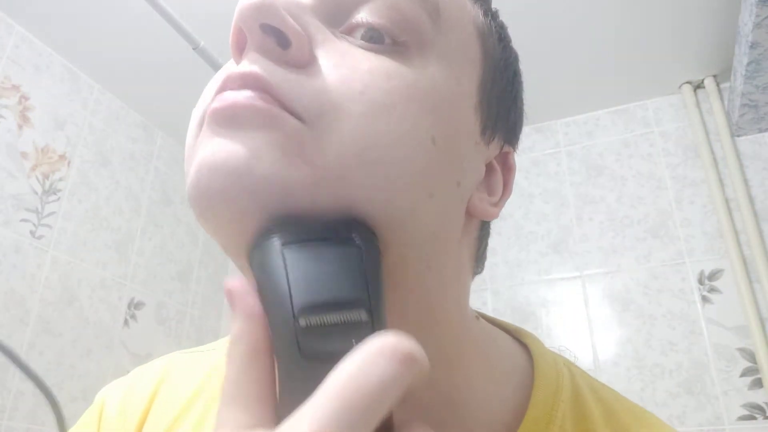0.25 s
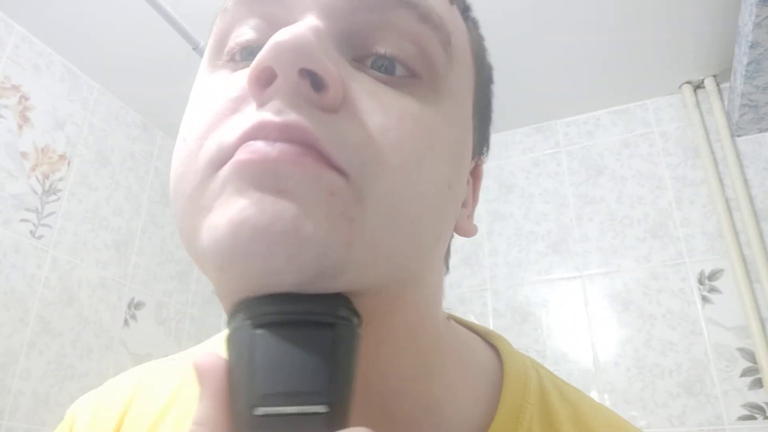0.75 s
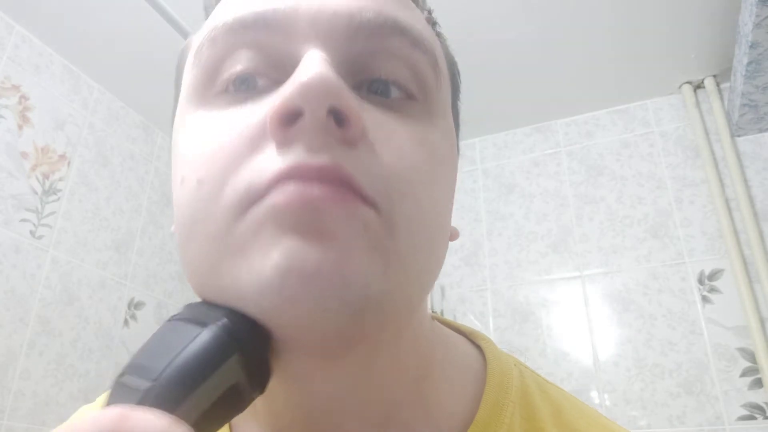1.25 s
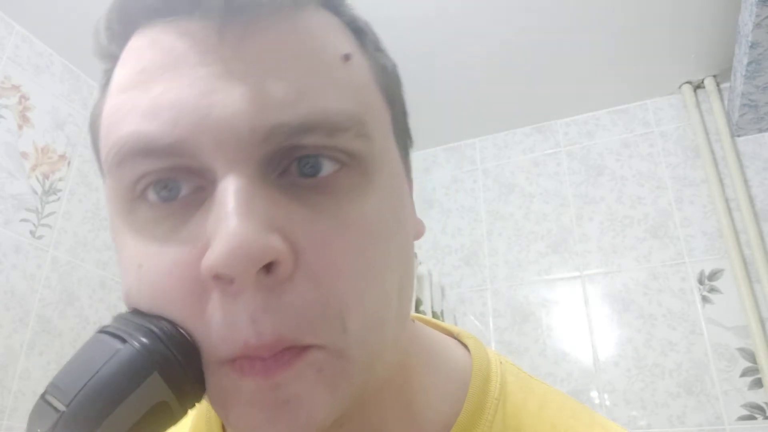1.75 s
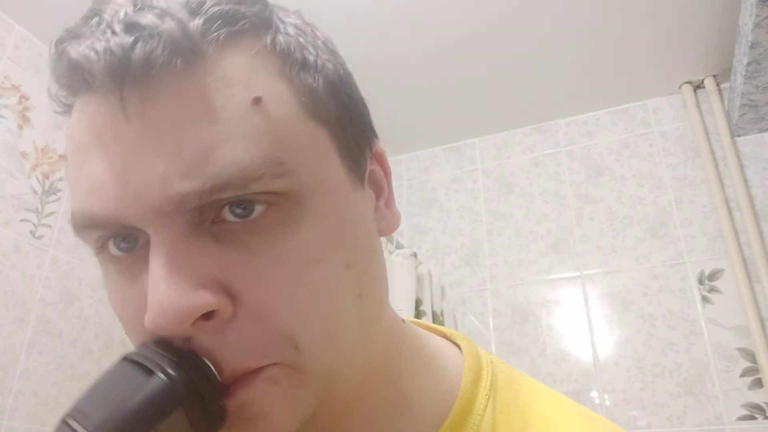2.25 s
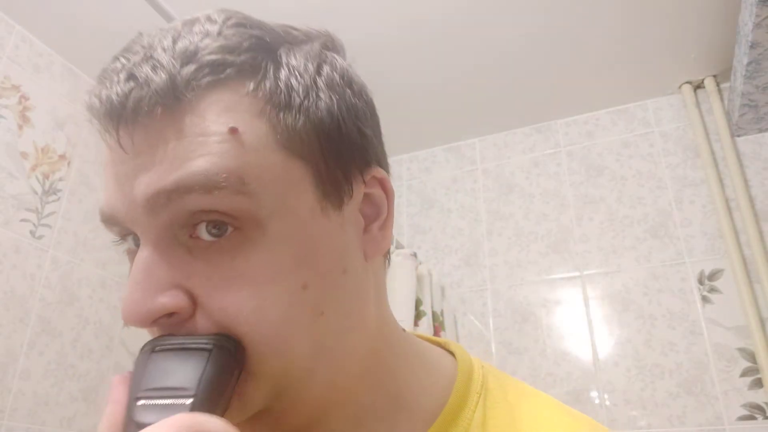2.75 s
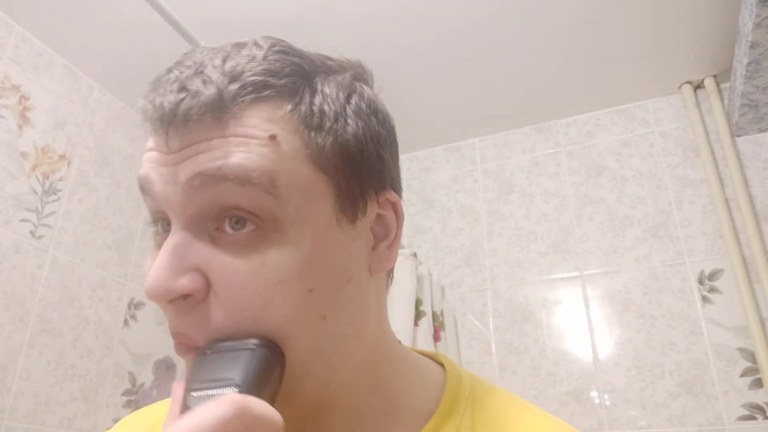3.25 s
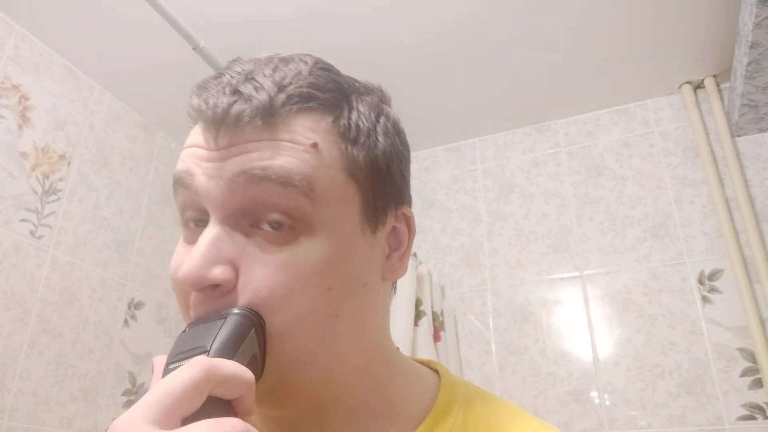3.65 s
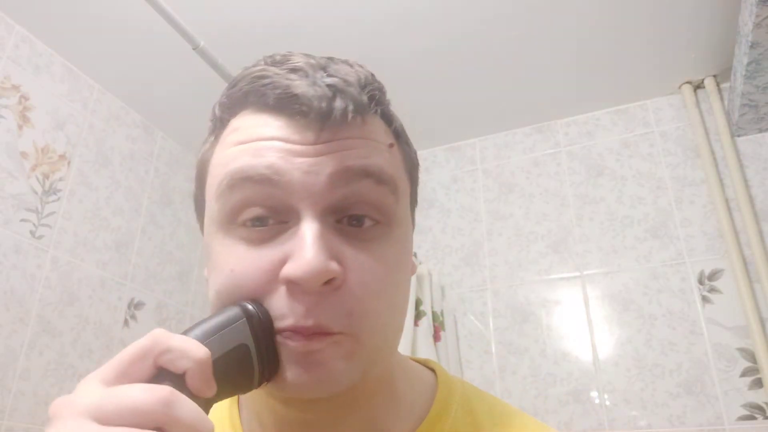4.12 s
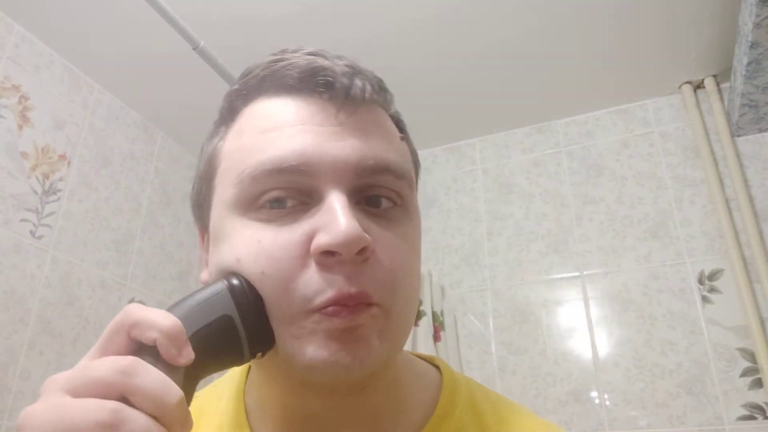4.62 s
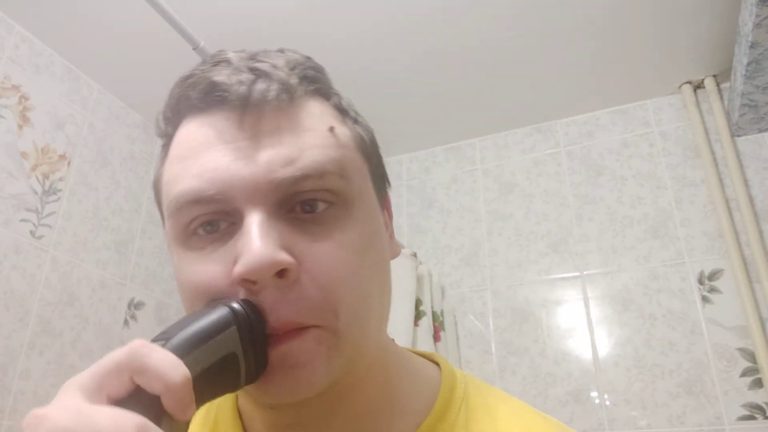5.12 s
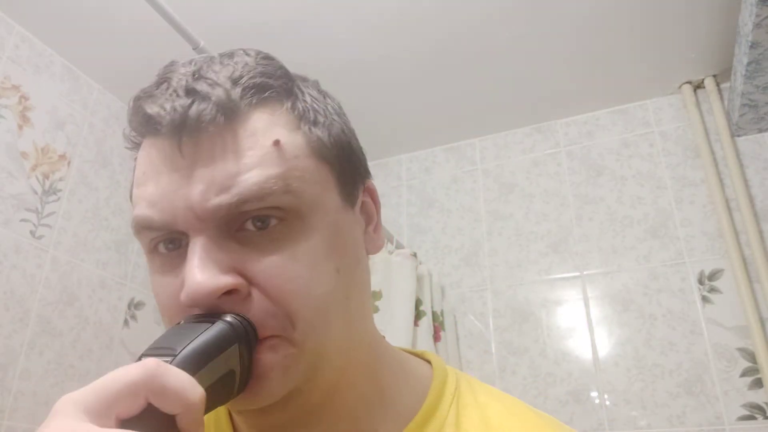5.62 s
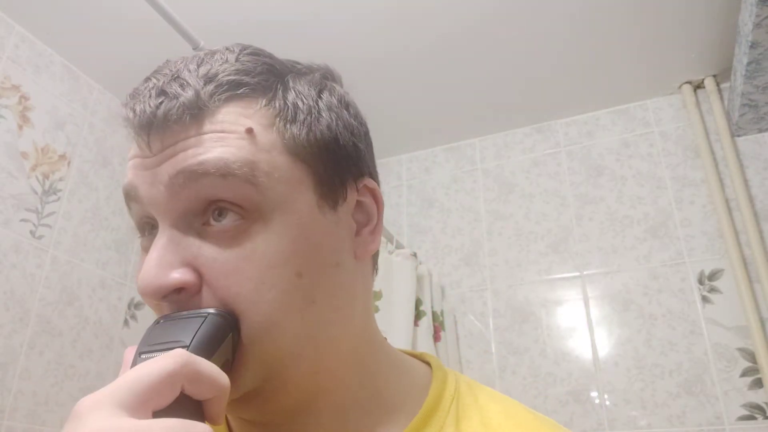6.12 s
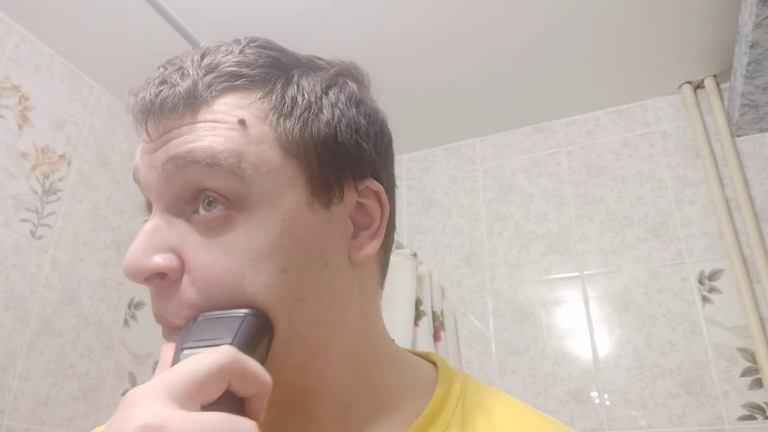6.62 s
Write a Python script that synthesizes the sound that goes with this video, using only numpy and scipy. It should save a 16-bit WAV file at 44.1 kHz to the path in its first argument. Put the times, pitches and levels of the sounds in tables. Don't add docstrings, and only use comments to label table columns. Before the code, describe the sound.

Already running at the start and never stopping, a rotary electric shaver whirs close to a phone in a small tiled bathroom for nearly seven seconds. Its gear and motor whine is steady, with a fast mechanical buzz, a gritty bright hiss and thin, very high metallic singing. On the neck, from 0 to 1 s, it is even; around 1.3-1.5 s the pitch lifts slightly and the hiss swells, then drops under load near 1.7 s. Small dry clicks and snips cluster from 1.8 to 2.3 s, with a sharper crack at 2.8 s amid rattlier, chirping treble. From 3.3 s the rub softens; pitch lifts a little around 3.9-4.5 s, with a thinner whine. Near 5.1, 5.5 and 6 s come more snips and brighter scraping. The low rumble is strongest near 1.8 s and dwindles; faint building hum stays beneath. It ends still running.

```python
import sys
import numpy as np
from scipy import signal
from scipy.fft import rfft, irfft
from scipy.io import wavfile
from scipy.ndimage import uniform_filter1d, map_coordinates

SR = 44100
rng = np.random.default_rng(int(sys.argv[2]) if len(sys.argv) > 2 else 0)


def to_wav(s):
    ch = np.atleast_2d(s).T
    pcm = np.round(np.clip(ch, -1, 1) * 32767)
    wavfile.write(sys.argv[1], SR, pcm.astype(np.int16))


def attenuation_scalar(level_db):
    decades = np.asarray(level_db, float) / 20
    return 10 ** decades


N = 302922
TIME = np.arange(N) / SR
TEETH, SLOTS, MOTOR_RATIO = 17, 90, 3.0206

# (t/s, f/Hz)
SING_PITCH = [(0, 11400), (.14, 11670), (.42, 11650), (.9, 11430), (1.5, 11620), (2.1, 11550),
              (2.55, 11520), (2.8, 11550), (3.2, 11560), (3.4, 11530), (3.72, 11330), (4.0, 11660),
              (4.2, 11580), (4.5, 11570), (5.5, 11460), (6.4, 11480), (6.87, 11580)]
# (t/s, turns counted)
HIGH_BLADE = [(0, -68.7), (2.122, 0), (2.341, 7), (2.59, 15), (2.808, 22), (3.18, 34), (3.962, 59),
              (5.078, 95), (5.481, 108), (5.732, 116), (5.981, 124), (6.39, 137), (6.87, 152.4)]


def curves(table):
    s, *columns = np.transpose(table)
    return [np.interp(TIME, s, column) for column in columns]


def walk(rate):
    hold = int(SR / rate)
    held = np.repeat(rng.standard_normal(N // hold + 1), hold)
    return 1.3 * uniform_filter1d(uniform_filter1d(held, hold), hold)[:N]


def swells(rest, rows):
    squareness = 2.8
    return rest + sum(lift * .5 ** (np.abs(2 * (TIME - middle) / length) ** squareness)
                      for middle, length, lift in rows)


def band(x, lo_hz, hi_hz):
    sos = signal.butter(2, [lo_hz, min(hi_hz, .45 * SR)], "band", fs=SR, output="sos")
    return signal.sosfilt(sos, x)


def colour(x, spectrum):
    hz, db = np.transpose(spectrum)
    gain = attenuation_scalar(np.interp(np.log(np.fft.rfftfreq(N, 1 / SR) + 1), np.log(hz), db))
    return irfft(rfft(x) * gain, N) * np.sqrt(SR / 2)


def pair(alike_hz):
    lag_s, treble_alike = 45e-6, 0.16
    mid, side = rfft(rng.standard_normal((2, N)))
    hz = np.fft.rfftfreq(N, 1 / SR)
    alike = np.clip(treble_alike + (1 - treble_alike) / (1 + hz / alike_hz), 0, 1)
    mid, side = mid * np.sqrt(1 + alike), side * np.sqrt(1 - alike)
    right = (mid - side) * np.exp(-2j * np.pi * hz * lag_s)
    return irfft(np.array([mid + side, right]), N) / np.sqrt(2)


def line(turns, db, wobble, flutter_db, lead=1.27):
    shared = rng.uniform(0, 2 * np.pi) + wobble * walk(25)
    lag = lead + .3 * walk(3)
    phase = 2 * np.pi * turns + shared + np.array([0 * lag, lag])
    level = attenuation_scalar(db + flutter_db * (walk(30.) + 0.37 * walk(9)))
    return np.sqrt(2) * level * np.sin(phase)


def clatter(wheel, hold_turns, alike):
    size = 1400
    pattern = rng.standard_normal((3, 120, size))
    place = [wheel / hold_turns, wheel % 1 * size]
    shared, *own = (map_coordinates(p, place, order=1, mode="grid-wrap") for p in pattern)
    return 1.5 * (alike * shared + np.sqrt(1 - alike ** 2) * np.array(own))


def building():
    hum_hz = [30.2, 78.8, 105.0]
    # (resting level/dB, [(middle t/s, length/s, lift/dB)])
    surges = [
        (-72, [(.29, 0.26, 12.5), (1.65, 0.38, 12), (3.65, 0.38, 7), (4.75, 0.89, 6), (5.44, 0.3, -10), (5.72, 0.32, 8.5), (6.58, 0.32, 6)]),
        (-80.5, [(0, 0.33, 10.5), (.86, 0.41, 5), (1.5, 0.45, 8), (3.75, 1, 11), (4.55, 0.39, 1), (6.15, 0.35, 4)]),
        (-85.5, [(1.3, 1.4, 13.5), (3.6, 0.43, 4), (4.6, 1.23, 13), (5.55, 0.54, 18.5), (5.95, 0.28, 7)]),
    ]
    tones = 0
    for hz, surge in zip(hum_hz, surges):
        apart = np.array([[0], [.4]]) * walk(2.5)
        wave = np.sin(2 * np.pi * hz * TIME + 1.9 * walk(6.4) + apart)
        tones = tones + attenuation_scalar(swells(*surge)) * wave * attenuation_scalar(2.5 * walk(15))
    mains = attenuation_scalar(-81.5) * np.sin(2 * np.pi * 195.7 * TIME)
    return np.sqrt(2) * (tones + mains) * attenuation_scalar(np.array([[.1], [-1.2]]))


def rumble(wheel):
    # (t/s, level/dB)
    rumble_levels = [
        (0.0, -70.5),
        (1.82, -65),
        (6.87, -87),
    ]
    low = pair(alike_hz=960.0) + 0.99 * clatter(wheel, hold_turns=7.66, alike=0.79)
    low = band(low, 117.0, 800.0)
    return attenuation_scalar(curves(rumble_levels)[0] - 2.5 + 0.32 * walk(3.8)) * low / np.std(low)


def snips():
    # (t/s, peak level/dB, thud level/dB, body level/dB)
    snip_events = [(0.306, -40, -25, -11), (0.4802, -32, -32, -24), (1.2841, -30, -19, -21.5),
                   (1.8376, -39, -29, -14), (2.0033, -34, -16, -35), (2.294, -33.5, -13.5, -21),
                   (2.8219, -22.5, -28, -24), (4.0368, -43, -31, -10), (5.1402, -31, -31, -24),
                   (5.4964, -29, -25, -25), (5.6076, -26.5, -22.5, -32), (5.994, -32, -13, -11.5)]
    out, t = np.zeros((2, N + SR)), np.arange(SR // 4) / SR
    for s, db, thud_db, body_db in snip_events:
        noise = rng.standard_normal((2, len(t)))
        tail = np.exp(-t / 0.0086) + 0.35 * np.exp(-t / 0.065)
        shape = (1 - np.exp(-t / 0.00067)) * tail
        crack = band(noise, 10500.0, 12640.0) * np.array([[1.2], [.12]])
        body = attenuation_scalar(body_db + 20.5) * band(noise, 1640.0, 2900.0)
        thud = attenuation_scalar(thud_db + 15.5) * band(noise, 690.0, 2000.0) * np.array([[1], [.45]])
        start = int(s * SR)
        out[:, start:start + len(t)] += attenuation_scalar(db - 3) * shape * (crack + body + thud)
    return out[:, :N]


def ticks():
    # (t/s, peak level/dB)
    tick_events = [(0.441, -36), (1.2845, -31), (1.6994, -32), (1.8382, -29.5), (1.8786, -34),
                   (1.9594, -34), (2.0043, -35), (2.0762, -40), (2.2964, -33), (2.8308, -33), (5.0294, -39),
                   (5.14, -39), (5.4952, -31), (5.9938, -28.5)]
    out, t = np.zeros((2, N + SR)), np.arange(SR // 20) / SR
    for s, db in tick_events:
        snap = band(rng.standard_normal((2, len(t))), 7700.0, 12500.0)
        snap = snap * np.exp(-t / 0.0033) * np.array([[1], [.2]])
        start = int(s * SR)
        out[:, start:start + len(t)] += attenuation_scalar(db + 6.5) * snap
    return out[:, :N]


def guards():
    guard_rings = {5380: (-70, [(.45, 0.42, 13.5), (1.45, 0.18, 12), (2.3, .3, 11), (5.3, 0.64, 7),
                   (6.6, .5, 3)]), 6110: (-79, [(.45, 1.1, 19), (2.95, .5, 14), (4.1, .3, 1), (5.3, .4, 1),
                   (6.1, 0.29, 7)]), 6550: (-73, [(1.0, 0.27, 3), (2.2, .3, -8), (2.9, 0.33, 15.5),
                   (4.35, .2, 10), (5.9, 0.49, 1)])}
    out = 0
    for hz, song in guard_rings.items():
        ring = band(rng.standard_normal((2, N)), hz - 90, hz + 90)
        level_db = swells(*song) + 2 * walk(10) + np.array([[-6], [7]])
        out = out + attenuation_scalar(level_db) * ring / np.std(ring)
    return out


def rubbing(wheel):
    # (f/Hz, level/dB per Hz)
    left_port = [(20, -84), (140, -99), (400, -100), (750, -95), (1250, -93), (1600, -91), (2500, -86),
                 (3400, -90), (4600, -90), (6200, -87), (7500, -85.5), (10000, -83.5), (13200, -85.5),
                 (15600, -87)]
    right_port = [(20, -90), (140, -97), (750, -101), (1250, -97), (1600, -87), (2500, -88), (3400, -89),
                  (4600, -85), (6200, -80), (7500, -84), (10000, -94), (13000, -101), (14800, -101),
                  (15300, -116)]
    # (t/s, rubbing level/dB, case against the jaw level/dB, head turned to the left port/dB)
    stroke = [(0.0, -49.5, 0.5, 1.5), (1.07, -49, -0.5, 1), (1.42, -48, 1, 4.5), (1.68, -51, 1.5, 2),
              (2.31, -49, 1.5, 2.5), (3.15, -50.5, 0, 0.5), (3.33, -52, 0, 1.5), (3.75, -52.5, 1, 0.5),
              (4.06, -49, 0, 1.5), (4.21, -54.5, 0.5, 2.5), (4.4, -50.5, 2, 4), (5.0, -53.5, 2, 1.5),
              (5.11, -48.5, 0.5, 1.5), (5.28, -52.5, 0.5, 0), (5.62, -50.5, 1, 1.5), (6.01, -49, 2.5, 0.5),
              (6.05, -51.5, 1, 2.5), (6.87, -52.5, 0, 3)]
    # (resting level/dB, [(middle t/s, length/s, lift/dB)])
    muffle = (0, [(.1, 0.28, 0), (.75, 0.21, -1.5), (3.65, 0.58, -0.5), (4.45, 0.45, -3), (6.5, 0.82, 0)])
    loose_contact = (0, [(.15, 0.26, 3.5), (.7, 0.41, -2.5), (1.55, 0.73, 1), (2.8, 0.34, 7.5),
                     (3.35, 0.35, -5), (4.0, 0.19, 3), (4.6, .25, 2.5), (5.85, 0.46, 2)])
    rub_db, body_db, facing_db = curves(stroke)
    edge_db = rub_db + 50.5 + facing_db * np.array([[.5], [-.5]])
    turn = 2 * np.pi * wheel
    pulse = attenuation_scalar(2.1 * np.cos(TEETH * turn) + 0.48 * np.cos(turn) + 0.98 * np.cos(2 * turn))
    grit = attenuation_scalar(2.0 * rng.exponential(size=N)) * attenuation_scalar(0.5 * walk(19) + 0.68 * walk(40) + 0.49 * walk(150))
    grit = grit / np.sqrt(np.mean(grit ** 2))
    hiss = pair(alike_hz=605.0)
    edge = (hiss + 0.36 * clatter(wheel, hold_turns=4., alike=0.16)) * grit * pulse
    edge = band(edge, 3680.0, SR / 2) * attenuation_scalar(edge_db)
    rattle = 1.335 * band(clatter(wheel, hold_turns=14., alike=0.43), 1493.0, 3240.0)
    body = hiss * attenuation_scalar(swells(*muffle)) + rattle * attenuation_scalar(swells(*loose_contact))
    body = band(body, 2.3, 2820.0) * attenuation_scalar(body_db + 1.73 * walk(6.))
    both = body - edge
    return np.array([colour(both[0], left_port), colour(both[1], right_port)])


def chirps():
    chirp_swells = (-51.5, [(1.3, .15, 8), (2.21, .26, 22), (2.72, .36, 19), (3.13, .25, 15), (3.6, .2, 13),
                    (3.92, .24, 19), (5.12, .2, 19), (5.38, .3, 18), (5.73, .2, 19), (5.95, .15, 17),
                    (6.42, .25, 14), (6.87, .15, 14)])
    sharpness = 5.
    turn = curves(HIGH_BLADE)[0]
    size_db = 1.5 * rng.standard_normal(300)[np.round(turn).astype(int) + 80]
    burst = attenuation_scalar(swells(*chirp_swells) + size_db) * np.exp(sharpness * (np.cos(2 * np.pi * turn) - 1))
    slot = 2 * np.pi * np.cumsum(curves(SING_PITCH)[0]) / SR / 4
    ring = np.sin(4 * slot + walk(150))
    ring += attenuation_scalar(-10) * np.sin(5 * slot + 3 * walk(200))
    ring += attenuation_scalar(-17) * np.sin(3 * slot + 3 * walk(200))
    return burst * ring * attenuation_scalar(np.array([[0], [-24]]))


def singing(wheel):
    slot_tones = {1: (283, -3, -7, 3), 2: (463, -37, -0.6, 2.5), 3: (294, 6, -20, 1),
                  4: (410, -1.5, -37, 1), 5: (518, 4, -40, 0.5)}
    songs = {2: (-51, [(.12, 0.19, 6), (.55, 1, 4), (1.43, 0.13, 9.5), (1.85, 0.34, -34), (2.29, 0.16, -13),
             (2.58, 0.4, 10), (3.9, 0.4, 3.5), (4.8, 0.21, -12), (5.08, 0.22, 6.5), (5.9, 0.57, 5.5),
             (6.8, 0.35, -17)]), 4: (-46.5, [(.2, 0.21, 3), (.75, 0.32, -2.5), (1.75, 0.53, 4),
             (2.23, 0.34, 7.5), (2.72, 0.55, 5.5), (3.12, 0.19, 2.5), (3.33, 0.092, -5.5), (3.75, 0.64, 2),
             (4.0, 0.089, 4.5), (5.15, 0.19, 5), (5.52, 0.5, 4.5), (5.72, 0.18, 3.5), (5.97, 0.23, 4),
             (6.44, 0.2, 4.5)]), 5: (-54.5, [(.65, 0.32, -14), (1.55, 0.6, 5), (2.7, 0.89, 6.5),
             (3.44, 0.23, -2), (4.9, 0.33, -3), (5.5, 0.82, 4), (6.15, 0.17, 3.5), (6.8, 0.36, -4)])}
    second_db, fourth_db, fifth_db = (swells(*song) for song in songs.values())
    level_db = {1: fifth_db, 2: second_db, 3: fourth_db - 15.5, 4: fourth_db, 5: fifth_db}
    slots = np.cumsum(curves(SING_PITCH)[0] / 4 * (1 + .006 * walk(11))) / SR
    strength = 1 + 0.029 * walk(5.8)

    def smooth(x, width_hz):
        return signal.lfilter(*signal.butter(1, width_hz / 2, fs=SR), x)

    out = 0
    for k, (width_hz, left_db, right_db, throb_db) in slot_tones.items():
        turn = 2 * np.pi * (wheel + (k == 2) * rng.uniform())
        flare = np.cos(turn) + .6 * np.cos(2 * turn) + .35 * np.cos(3 * turn)
        throb = attenuation_scalar(throb_db * strength * flare)
        chance = rng.standard_normal((2, N)) + 1j * rng.standard_normal((2, N))
        smear = smooth(chance, width_hz)
        smear = smear + 1.12 * smooth(chance[::-1], 0.11 * width_hz)
        smear = smooth(smear, 4 * width_hz)
        tone = throb * np.real(smear * np.exp(2j * np.pi * k * slots))
        tone = tone / np.sqrt(np.mean(tone ** 2))
        out = out + attenuation_scalar(level_db[k] + np.array([[left_db], [right_db]])) * tone
    return out


def drive(wheel):
    mesh_spots = {1: (-67, [(1.75, 0.3, -8), (2.7, 1.186, 3), (3.5, .2, -5), (5.0, 0.44, -4.5),
                  (6.4, 0.95, 4.5)]), 3: (-67.5, [(.13, 0.24, 9), (1.55, 2.6, 10), (.35, .14, -6),
                  (.7, .2, -4), (1.03, 0.32, 7), (1.25, .07, -6), (1.45, 0.3, 5.5), (1.83, .22, -3),
                  (2.14, 0.33, 9.5), (2.5, 0.24, -20), (2.72, 0.16, -4), (3.0, 0.2, -5), (3.5, 0.3, 5),
                  (3.8, .3, 10), (4.24, .58, 14), (4.69, .18, 13), (5.3, 0.65, 10.5), (6.35, .3, 4),
                  (6.8, 0.2, 5)]), 4: (-68, [(.15, .1, 6), (.39, .12, 13), (1.0, .4, 6), (1.5, .15, 9),
                  (1.8, .35, 7), (2.45, .95, 13), (3.3, .6, 4), (4.08, .15, 7), (4.62, .2, 7),
                  (5.5, 1, 11.5)]), 5: (-66, [(.12, .3, 5), (.4, .2, 4), (.85, .8, 7), (1.45, .3, 5),
                  (2.6, .3, 4), (2.9, .2, 11), (3.2, .3, 4), (3.9, .5, -5), (4.63, .1, 9), (5.1, .2, 3),
                  (6.5, .9, 5.5)])}
    shaft_spots = {3: (-91, [(.4, 1.2, 16.5)]), 9: (-73, [(1.5, 0.18, 6), (2.7, 0.5, 4), (3.45, 0.44, 5),
                   (4.55, 0.9, -22)]), 10: (-71.5, [(.64, 0.23, 4), (1.07, 0.24, 3.5), (1.7, 0.32, 4.5),
                   (2.9, .4, -2), (3.6, 0.51, 2), (6.15, 0.38, -1)]), 11: (-72, [(.43, 0.12, 6),
                   (1.1, 0.4, 5), (1.6, .2, 4), (1.9, .2, 5), (2.35, 0.7, 8), (3.44, 0.17, 8.5),
                   (4.4, 0.64, -13), (5.2, 0.38, 8), (6.2, 0.67, -2), (6.87, 0.37, 8)]),
                   15.4: (-72.5, [(.1, 0.28, 4), (.95, .6, 5), (3.9, 0.22, 6), (4.3, 0.42, 13),
                   (4.75, 0.17, 12.5), (6.05, .15, 14), (6.75, 0.37, 14)]), 18: (-72, [(.5, .2, 14),
                   (2.1, .6, 9), (2.9, .25, 9), (3.7, .2, 7), (4.4, .4, 9), (5.35, .3, 7), (6.7, .4, 7)]),
                   24.4: (-80, [(.2, .2, 14), (1.35, .4, 17), (1.85, .25, 15), (4.62, .2, 17),
                   (6.2, .5, 12)]), 20: (-63, [(.17, .24, 5), (.57, .16, 6), (.38, .12, -5), (.8, .2, -4),
                   (1.3, .2, 8), (1.9, .6, 8), (2.4, .25, -3), (2.7, .2, 2), (3.7, .2, 3), (3.84, .1, 3),
                   (4.1, .2, -5), (4.4, .32, 6), (4.7, .2, -10), (5.62, .76, -8), (6.14, .26, 9),
                   (6.55, .6, 7.5)])}
    slot_spots = [
        (-68, [(1.42, .4, 11), (3.2, .7, 8), (4.3, .14, 11), (5.45, .55, 9), (6.1, .3, 5)]),
        (-72, [(1.5, .45, 8), (3.4, .6, 7), (5.4, .4, 7)]),
    ]
    mesh_ports = {1: ((4, []), (.15, [])), 3: ((-8, [(1.85, 1.2, 5), (6.3, 1.1, 6)]),
                  (2.3, [(.12, .26, -1.5), (1.85, 1.2, -2.8), (3.0, .6, -2), (4.25, .6, -.6),
                  (6.3, 1.2, -2.2)])), 4: ((2, [(.9, 1.6, 4), (5.5, .9, -1.5)]), (.1, [(2.1, 1.4, -1.1)])),
                  5: ((8, [(.8, .9, 8), (1.7, .7, -9)]), (0, [(.9, 1, 1)]))}
    shaft_ports = {3: ((6, []), (1, [])), 9: ((10, []), (1.4, [])), 10: ((9, []), (1.4, [])), 11: ((9, []),
                   (1.4, [])), 15.4: ((-2, []), (1.4, [])), 18: ((2, []), (.5, [])), 24.4: ((0, []),
                   (.5, [])), 20: ((-7, [(6.5, 1, 6)]), (0, [(.9, .5, 3), (2.0, .9, 3)]))}
    faint = {MOTOR_RATIO * 6: (-80, -79), TEETH * 3 + 1: (-76, -67), TEETH * 5 + 1: (-67, -70),
             TEETH * 2: (-82.5, -72), TEETH + 1: (-79, -82), MOTOR_RATIO * 8: (-78, -84)}
    side = np.array([[.5], [-.5]])
    runout = 0.07 * np.sin(2 * np.pi * wheel) / (2 * np.pi)
    out = 0
    for k, (pan, lead) in mesh_ports.items():
        db = swells(*mesh_spots[k]) + swells(*pan) * side
        turns = k * TEETH * wheel + k * runout
        out = out + line(turns, db, wobble=.12 + 0.03 * k, flutter_db=2.2, lead=swells(*lead))
    for k, (pan, lead) in shaft_ports.items():
        db = swells(*shaft_spots[k]) + swells(*pan) * side
        out = out + line(k * MOTOR_RATIO * wheel, db, wobble=.35, flutter_db=2.4, lead=swells(*lead))
    slot_db = np.array([swells(*port) for port in slot_spots])
    out = out + line(SLOTS * wheel, slot_db, wobble=.8, flutter_db=2.0, lead=.2)
    for k, db in faint.items():
        out = out + line(k * wheel, np.array(db)[:, None], wobble=0.11, flutter_db=3.0)
    return out


def scene():
    # (t/s, wheel turns f/Hz)
    wheel_speed = [(0, 32.2), (.3, 32.38), (.7, 32.3), (.9, 32.58), (1.12, 32.5), (1.3, 32.95),
                   (1.52, 32.85), (1.68, 32.05), (1.9, 32.22), (2.1, 31.98), (2.3, 32.27), (2.5, 32.1),
                   (2.7, 32.18), (3.1, 31.98), (3.3, 32.1), (3.75, 32.02), (3.92, 32.42), (4.55, 32.38),
                   (4.9, 32.0), (5.1, 32.17), (5.5, 32.07), (5.7, 31.92), (5.9, 32.02), (6.1, 31.91),
                   (6.5, 31.96), (6.87, 32.15)]
    wheel = np.cumsum(curves(wheel_speed)[0] * (1 + .0012 * walk(9.))) / SR
    background = building() + rumble(wheel)
    hairs = snips() + ticks()
    blades = guards() + rubbing(wheel) + chirps() + singing(curves(HIGH_BLADE)[0])
    return background + hairs + blades + drive(wheel)


def masking(x, under_db):
    frame = dict(window="cosine", nperseg=2048, noverlap=1024)
    hz, _, cells = signal.stft(x, SR, **frame)
    power = np.abs(cells) ** 2
    near = uniform_filter1d(power, size=3, axis=1)
    louder = uniform_filter1d(power.max(axis=0), size=120, axis=0)
    kept = (near > louder * attenuation_scalar(2 * under_db)) | (hz[:, None] < 3000)
    return signal.istft(cells * kept, SR, **frame)[1][:, :N]


def top_cut(x):
    return signal.sosfilt(signal.butter(12, 15870, fs=SR, output="sos"), x)


def record(dry):
    top = signal.ellip(12, .3, 80, 15760, fs=SR, output="sos")
    mix = masking(signal.sosfilt(top, dry), under_db=-21)
    return top_cut(mix)


dry = scene()
out = record(dry)
to_wav(out)
```